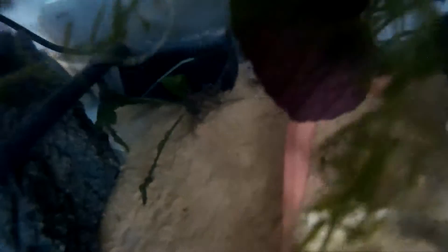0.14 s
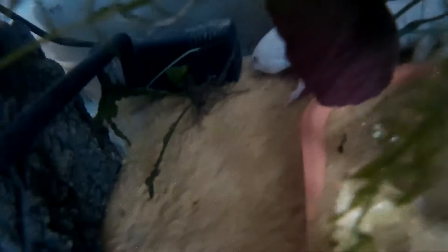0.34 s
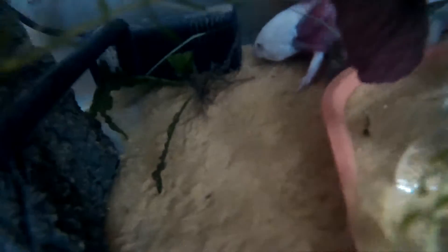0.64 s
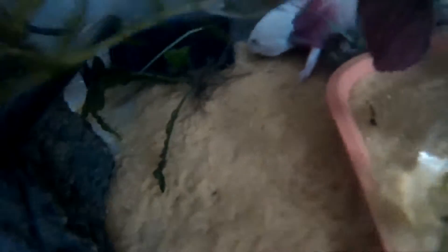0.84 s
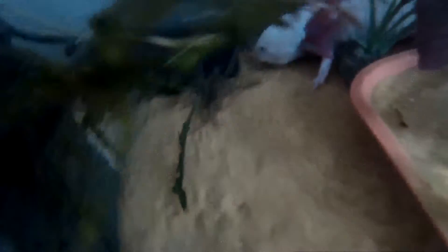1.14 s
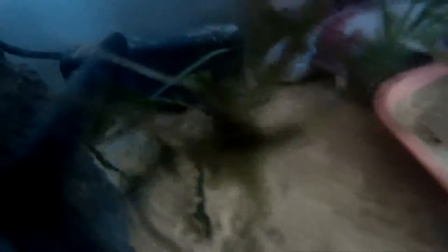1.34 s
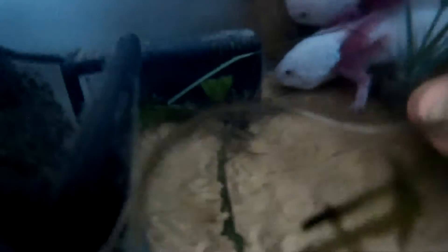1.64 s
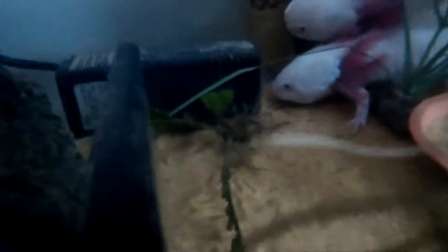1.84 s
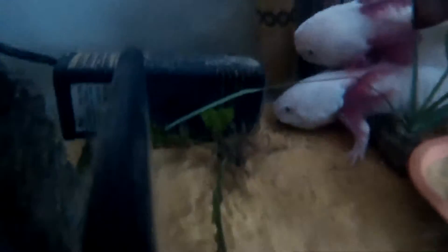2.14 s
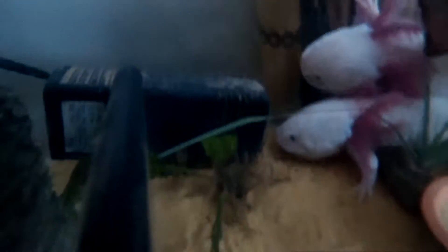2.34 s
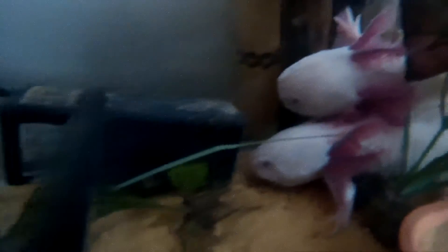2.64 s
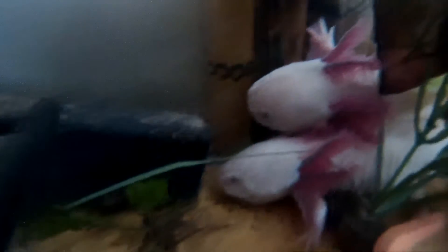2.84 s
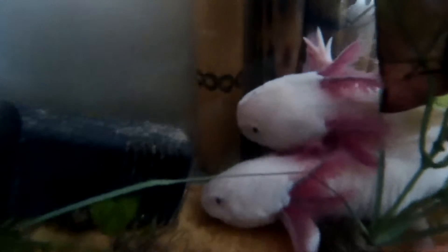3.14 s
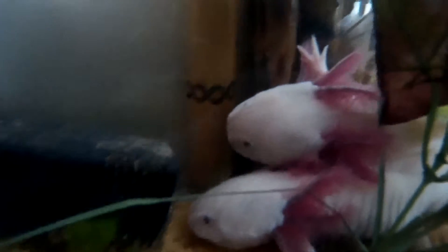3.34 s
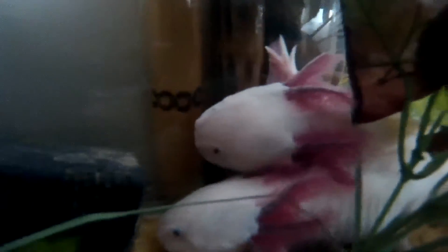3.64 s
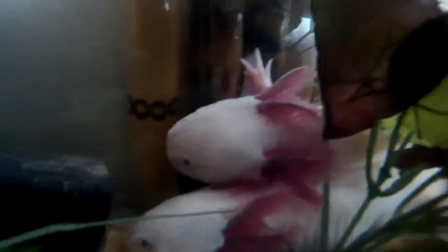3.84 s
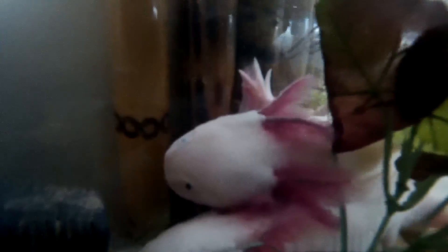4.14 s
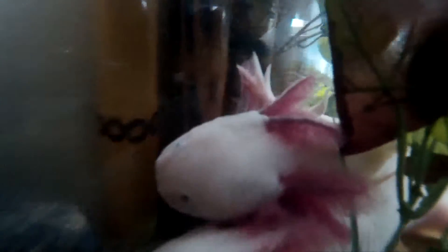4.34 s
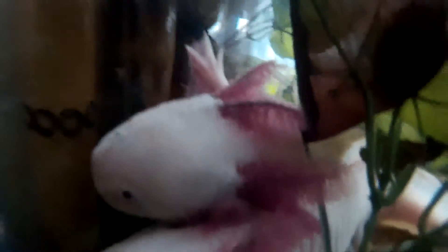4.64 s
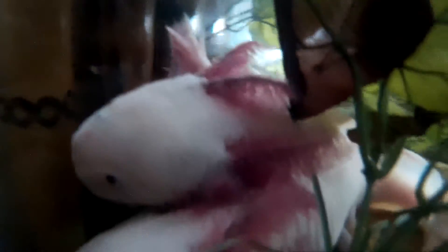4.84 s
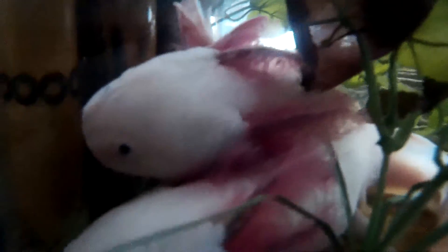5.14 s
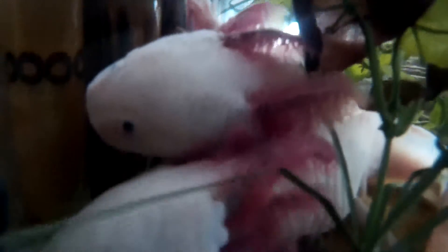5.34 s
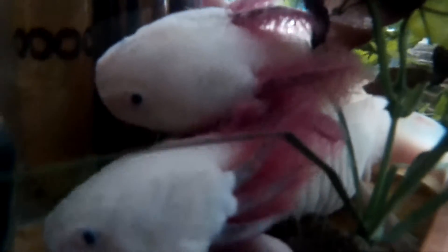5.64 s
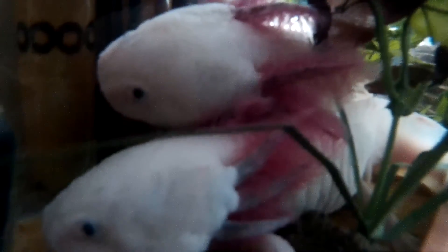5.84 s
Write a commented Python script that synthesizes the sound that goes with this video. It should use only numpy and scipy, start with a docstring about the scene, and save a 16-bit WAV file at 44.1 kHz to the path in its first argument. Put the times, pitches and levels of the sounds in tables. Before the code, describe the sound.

In a quiet room, a hand-held camera scrapes lightly on an aquarium, then hits the glass with a loud knock, followed by dull bumps and a quick rattle of sharp clicks and knocks. A few light ticks and small water plips come next. The tank's pump hums low and faint, growing as the microphone comes closer, over soft hiss and handling rumble.

```python
"""Camera against an aquarium

A hand-held camera scrapes, bumps and rattles on the tank's glass, each hit ringing case and pane,
then slides along it with a few light ticks and plips of water. The pump hums on harmonics of the
mains and grows as the camera comes nearer. Underneath sit a quiet room, microphone hiss,
grip rumble and the thin, pulsing whine of the camera's electronics."""
import sys
import numpy as np
from scipy import signal
from scipy.fft import rfft, irfft, next_fast_len
from scipy.io import wavfile
from scipy.ndimage import uniform_filter1d, map_coordinates

SR = 44100
rng = np.random.default_rng(int(sys.argv[2]) if len(sys.argv) > 2 else 0)


def inscribe(sig):
    """Save sig as 16-bit PCM at rate SR to the path in sys.argv[1].

    A 1-D sig is mono; a 2-D sig holds one channel per row.
    Samples are clipped to [-1, 1] before scaling.
    """
    pcm = np.round(np.clip(np.atleast_2d(sig).T, -1, 1) * 32767)
    wavfile.write(sys.argv[1], SR, pcm.astype(np.int16))


N = 264159
MAINS_HZ, TOP_HZ = 50.02, 15850

# room tone with microphone hiss: frequency_hz, density_db
ROOM_SPECTRUM = [(20, -5.5), (50, -4), (100, -4.5), (200, -9.5), (400, -15), (800, -18), (1500, -22),
                 (3000, -25.5), (6000, -27.5), (10000, -27), (14500, -28), (15800, -33)]
# rumble of the hand on the case: frequency_hz, density_db
GRIP_SPECTRUM = [(20, 2.5), (55, 2.5), (150, -12), (400, -33.5), (2000, -74)]
# the pump's drone as the camera travels along the tank: time_s, level_db
DRONE_LEVELS = [(2.7, -65), (2.94, -66), (3.51, -57.5), (4.38, -62.5), (5.75, -52), (5.99, -51)]
# the pump's buzz: mains_multiple, relative_db
BUZZ_PARTIALS = [(3, -5.5), (4, 0), (9, -13.5), (10, -18.5), (12, -14), (14, -16), (18, -26)]
# standing-wave crests the camera passes: mains_multiple, middle_s, crest_db, half_length_s, depth_db
STANDING_WAVES = [(6, 4.8, -68, .8, 14), (8, 5.55, -64.5, 0.85, 20)]
# churned water: frequency_hz, density_db
WATER_SPECTRUM = [(20, -39), (130, -3.5), (300, -5), (420, -3), (520, -7), (700, -8.5), (1100, -19.5),
                  (1900, -15.5), (3500, -28.5), (8000, -44.5)]
# light ticks: start_s, peak_db, pitch_hz, t60_s, spread_octaves
LIGHT_TICKS = [(0.4434, -44, 5130, 0.0091, 0.41), (3.2612, -42.5, 7500, .01, 1.53),
               (3.2871, -32.5, 1855, 0.023, 0.31), (3.427, -44.5, 5000, 0.0088, 1.62),
               (3.4971, -30, 2710, 0.0091, 0.41), (3.5279, -33, 3600, 0.013, 1.67),
               (3.687, -52.5, 1080, .03, 1.42), (4.089, -57.5, 1800, .016, 0.76),
               (4.684, -50, 2306, .016, 1.1)]
# short scrapes on the glass: middle_s, level_db, half_length_s
SCRAPE_STROKES = [(1.16, -68.5, 0.021), (1.216, -60.5, 0.01), (1.455, -62, 0.0034), (1.5, -65, .025),
                  (1.612, -43, 0.0052), (1.652, -59, 0.009), (1.717, -55, 0.0056), (1.913, -59, 0.0068),
                  (1.951, -58, 0.0072), (2.072, -58, 0.04), (2.414, -42, 0.005), (2.452, -46, 0.013)]
# tone colour of the scraping: frequency_hz, density_db
SCRAPE_SPECTRUM = [(260, -30), (450, -17), (560, -4.5), (770, -12.5), (890, -8.5), (1060, -21),
                   (1320, -12.5), (1800, -15.5), (2600, -20), (3200, -27.5), (4200, -26), (4800, -40),
                   (8000, -58)]
# ring of the case, pane, lens rim, button and the tank's low boom: pitch_hz, relative_db, t60_s
CASE_MODES = [(310, -13, 0.02), (375, -14, 0.0086), (540, 0.5, 0.028), (880, -21, .035),
              (1330, -15.5, 0.023), (1770, -18.5, .012), (2500, -10, 0.014), (3575, -24, 0.0087)]
PANE_MODES = [(649, -2, 0.033), (642, -26, 0.38), (725, -0.5, 0.035), (754, -26, 0.2)]
RIM_MODES = [(1640, -19, 0.091), (1833, 2, 0.015), (2066, -5, 0.025), (2520, -4.5, 0.015),
             (5230, -19, 0.0053), (7500, -26, .008)]
BUTTON_MODES = [(3690, 2, 0.01)]
TANK_MODES = [(205, 0, .16)]
# soft bumps: start_s, peak_db, cutoff_hz
SOFT_THUMPS = [(1.366, -47.5, 250), (1.611, -23, 400), (1.654, -34, 248), (1.8444, -27, 730),
               (1.903, -29.5, 600), (1.9118, -20.5, 480), (1.9224, -24.5, 230), (1.9302, -30.5, 180),
               (2.096, -43, 501), (2.872, -49.5, 100)]
# lens rim on the pane: start_s, peak_db, button_db (relative to the case)
RIM_CLICKS = [(1.4535, -50, 5), (2.1645, -44, 4), (2.218, -45.5, -1.5), (2.3325, -13, 12),
              (2.3758, -17, -18.5), (2.4856, -41, 13.5)]
# case on the tank: start_s, peak_db, cutoff_hz, thud_db, pane_db (last two relative to the case)
CASE_KNOCKS = [(1.5708, 1, 3300, -7, -1.5), (1.587, -18.5, 1490, -16.5, -1.5), (1.606, -21, 1300, -2, 0),
               (1.718, -45, 2000, -5, 12), (1.8638, -9.5, 730, 4.5, -15.5), (2.0373, -40, 1000, -2, -21),
               (2.07, -30, 900, -3, -9), (2.4, -3.5, 720, -27.5, -22.5), (2.4198, -10.5, 800, -24, -17.5),
               (2.4434, -20.5, 2420, -3.5, -13.5), (2.4733, -12.5, 750, -37, -37),
               (2.7051, -46, 1195, -7, 9)]
# plips of water: start_s, peak_db
WATER_PLIPS = [(3.2876, -50.5), (3.461, -43.5), (3.567, -34)]


def amp(db):
    """Decibels to gain."""
    return 10 ** (np.asarray(db) / 20)


def unit(x):
    """Scale to rms 1."""
    return x / np.sqrt(np.mean(x ** 2) + 1e-20)


def wobble(rate_hz):
    """Smooth random drift, with rate_hz new values a second."""
    knots = rng.standard_normal(int(N * rate_hz / SR) + 4)
    return map_coordinates(knots, [np.arange(N) * rate_hz / SR])


def swell(middle_s, half_s, order):
    """A fade up to 1 and down again; a higher order makes it squarer."""
    return 1 / (1 + np.abs((np.arange(N) / SR - middle_s) / half_s) ** order)


def coloured(x, spectrum):
    """EQ x to a spectrum, at rms 1."""
    hz, db = np.transpose(spectrum)
    size = next_fast_len(N + 8192)
    gain = amp(np.interp(np.log(np.fft.rfftfreq(size, 1 / SR) + 1), np.log(hz), db))
    return unit(irfft(rfft(x, size) * gain, size)[:N])


def rolloff(x, hz, kind, order):
    """Butterworth low-pass or high-pass."""
    return signal.sosfilt(signal.butter(order, min(hz, SR / 2 - 1), kind, fs=SR, output="sos"), x)


def place(track, start_s, peak_db, sound):
    """Lay a sound into the track at the given peak level."""
    i = round(start_s * SR)
    track[i:i + len(sound)] += (amp(peak_db) * sound / np.abs(sound).max())[:N - i]


def grip_rumble(rest_db=-80, moving_db=-66.5, drift_db=5.0):
    """The hand rumbles unevenly on the case, louder while the camera moves."""
    level_db = rest_db + (moving_db - rest_db) * swell(middle_s=2.8, half_s=2.55, order=8)
    rumble = coloured(rng.standard_normal(N), GRIP_SPECTRUM)
    return amp(level_db + drift_db * wobble(6.4)) * rumble


def room_tone(level_db=-65):
    """A steady bed of room noise and microphone hiss."""
    return amp(level_db) * coloured(rng.standard_normal(N), ROOM_SPECTRUM)


def mains_tone(multiple):
    """One harmonic of the mains, at rms 1 and a random phase."""
    phase = 2 * np.pi * MAINS_HZ * np.arange(N) / SR
    return np.sqrt(2) * np.sin(round(multiple) * phase + 2 * np.pi * rng.random())


def pump(far_db=-77, near_db=-63, arrive_s=4.06, approach_s=0.14, water_db=-5.5, waver_db=-0.5):
    """The vibrating pump drones at twice the mains pitch; buzz and churned water come up close by."""
    t = np.arange(N) / SR
    drone_db = np.interp(t, *np.transpose(DRONE_LEVELS))
    nearness = (1 + np.tanh((t - arrive_s) / (2 * approach_s))) / 2
    buzz_db = far_db + (near_db - far_db) * nearness
    buzz_db += .35 * (drone_db - drone_db.max())  # the buzz rides part of the drone's swings
    buzz = sum(amp(db + waver_db * wobble(2.2)) * mains_tone(k) for k, db in BUZZ_PARTIALS)
    standing = sum(amp(db - depth_db * (1 - swell(middle_s, half_s, order=4))) * mains_tone(k)
                   for k, middle_s, db, half_s, depth_db in STANDING_WAVES)
    water = amp(water_db) * coloured(rng.standard_normal(N), WATER_SPECTRUM)
    return amp(drone_db) * mains_tone(2) + standing + amp(buzz_db) * (buzz + water)


def electronics_whine(picked_up, pitch_hz=9525.4, pulse_hz=36.35, rest_db=-78, rise_db=4.5):
    """A high tone, part steady, part flipped by a square wave; it lifts with the sound picked up."""
    t = np.arange(N) / SR
    power = np.abs(uniform_filter1d(picked_up ** 2, round(0.27 * SR)))
    level_db = rest_db + rise_db * power / (power + amp(-54.5) ** 2)  # half the lift at -54.5 dB
    phase = 2 * np.pi * pitch_hz * t
    square = np.tanh(6 * np.sin(2 * np.pi * pulse_hz * t))
    return amp(level_db) * unit(.44 * np.sin(phase + .9) + square * np.sin(phase))


def cluster(hz, t60_s, spread_octaves, rise_s=0.001, count=32):
    """A burst of short modes around one pitch: narrow sounds round, wide sounds dry."""
    t = np.arange(SR // 10) / SR
    pitches = hz * 2 ** (spread_octaves * (np.linspace(-1, 1, count) + rng.normal(0, 0.031, count)))
    weights = np.sqrt(np.hanning(count + 2)[1:-1]) * (pitches < TOP_HZ)
    # the wider the cluster, the less its modes start in step
    phases = rng.standard_normal(count) * min(spread_octaves * 7, np.pi)
    waves = weights @ np.sin(2 * np.pi * pitches[:, None] * t + phases[:, None])
    return waves * amp(-60 * t / t60_s) * (1 - np.exp(-t / rise_s))


def ticks():
    """Small dry ticks, most of them as the camera slides along the glass."""
    track = np.zeros(N)
    for start_s, db, hz, t60_s, spread_octaves in LIGHT_TICKS:
        place(track, start_s, db, cluster(hz, t60_s, spread_octaves))
    return track


def scraping(drag_db=-67, flutter_db=3, grains_per_s=2500):
    """The case sticks and slips on the glass: one long, light drag with short strokes on top."""
    drag = amp(drag_db) * swell(middle_s=2.06, half_s=0.65, order=8)
    strokes = sum(amp(db) * swell(middle_s, half_s, order=4) for middle_s, db, half_s in SCRAPE_STROKES)
    grains = rng.standard_normal(N) * (rng.random(N) < grains_per_s / SR)
    grains *= amp(flutter_db * wobble(90))
    return (drag + strokes) * coloured(grains, SCRAPE_SPECTRUM)


def ring(modes, t, scatter_db=4.0, detune=0.0014, rise_s=0.00028):
    """Damped modes with a fast attack; they vary as each hit lands on a slightly different spot."""
    hz, db, t60_s = np.transpose(modes)[:, :, None]
    level_draw, pitch_draw = rng.standard_normal((2, len(modes), 1))
    sign = (-1) ** np.arange(len(modes))[:, None]  # neighbouring modes swing in opposite directions
    decays = amp(db + scatter_db * level_draw - 60 * t / t60_s)
    waves = sign * decays * np.sin(2 * np.pi * hz * (1 + detune * pitch_draw) * t)
    return waves.sum(axis=0) * (1 - np.exp(-t / rise_s))


def impact(cutoff_hz, thud_db, pane_db, rim_db, button_db,
           thud_hz=175, thud_t60_s=0.016, crack_t60_s=0.025, rattle_t60_s=.04):
    """One hit shoves the camera, rattles its loose parts and rings case, pane, lens rim and button."""
    t = np.arange(SR // 2) / SR
    thud = amp(thud_db - 60 * t / thud_t60_s) * np.sin(2 * np.pi * thud_hz * t)
    crack = amp(-21 - 60 * t / crack_t60_s) * rng.standard_normal(len(t))
    rattle = unit(rolloff(rng.standard_normal(len(t)), 3400, "low", order=4))
    rattle *= amp(-35 - 60 * t / rattle_t60_s)
    parts = [(CASE_MODES, 0), (PANE_MODES, pane_db), (RIM_MODES, rim_db), (BUTTON_MODES, button_db)]
    ringing = sum(amp(db) * ring(modes, t) for modes, db in parts)
    hit = ringing - thud + crack + rattle
    # a soft contact lasts longer and cannot excite the high modes
    hit = rolloff(hit, cutoff_hz, "low", order=1)
    hit = rolloff(hit, cutoff_hz * 2.5, "low", order=1)
    return rolloff(hit, 53, "high", order=1)


def thumps(boom_db=-19.5):
    """Soft bumps mostly shove the camera; the tank answers with a low boom."""
    track = np.zeros(N)
    for start_s, db, cutoff_hz in SOFT_THUMPS:
        place(track, start_s, db, impact(cutoff_hz, thud_db=14.5, pane_db=-23, rim_db=-3, button_db=-8.5))
        place(track, start_s, db + boom_db, ring(TANK_MODES, np.arange(SR // 2) / SR))
    return track


def rim_clicks(bounce_s=.0033, bounce_db=-6.5):
    """The lens rim clicks brightly on the pane, bounces and lands again."""
    track = np.zeros(N)
    for start_s, db, button_db in RIM_CLICKS:
        click = impact(cutoff_hz=5000, thud_db=4.5, pane_db=-10, rim_db=7.5, button_db=button_db)
        bounce = impact(cutoff_hz=4000, thud_db=-5, pane_db=-9.5, rim_db=4, button_db=-12)
        place(track, start_s, db, click)
        place(track, start_s + bounce_s, db + bounce_db, bounce)
    return track


def knocks():
    """The case knocks on the tank, each hit with its own blend of thud and glass."""
    track = np.zeros(N)
    for start_s, db, cutoff_hz, thud_db, pane_db in CASE_KNOCKS:
        place(track, start_s, db, impact(cutoff_hz, thud_db, pane_db, rim_db=-14, button_db=-16))
    return track


def plips(pitch_hz=695, undertone_hz=417, undertone_db=-8.5, t60_s=0.091):
    """Round plips of water, all at one pitch, each with a lower resonance under it."""
    track = np.zeros(N)
    for start_s, db in WATER_PLIPS:
        place(track, start_s, db, cluster(pitch_hz, t60_s, spread_octaves=0.054))
        place(track, start_s, db + undertone_db, cluster(undertone_hz, t60_s, spread_octaves=0.15))
    return track


def scene():
    """The mono mix at the camera's microphone, with the whine on top."""
    action = knocks() + thumps() + rim_clicks() + ticks() + plips() + scraping()
    bed = pump() + grip_rumble() + room_tone()
    picked_up = action + bed
    return (picked_up + electronics_whine(picked_up))[None]


def record(dry, ceiling=.66):
    """The hardest hit clips the microphone; everything above TOP_HZ is cut."""
    clipped = np.clip(dry, -ceiling, ceiling)
    size = next_fast_len(N + 8192)
    passband = np.fft.rfftfreq(size, 1 / SR) < TOP_HZ
    return irfft(rfft(clipped, size) * passband, size)[..., :N]


dry = scene()
out = record(dry)
inscribe(out)
```